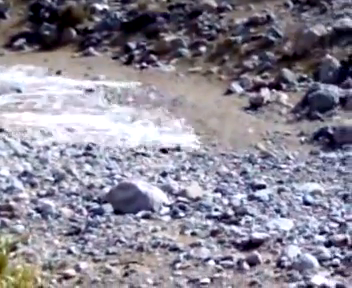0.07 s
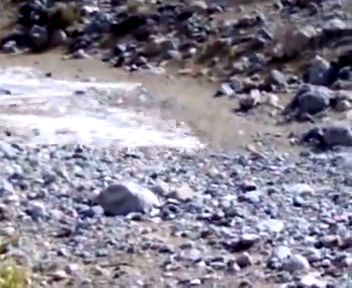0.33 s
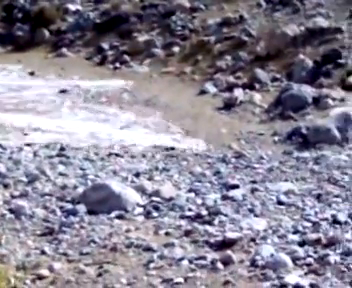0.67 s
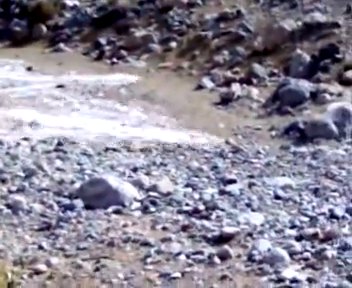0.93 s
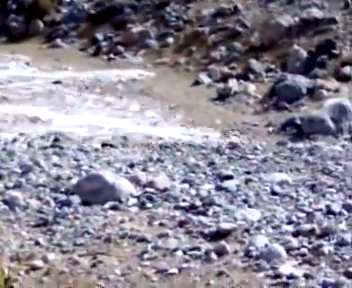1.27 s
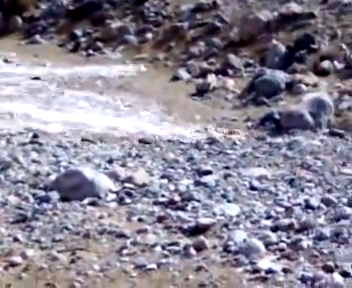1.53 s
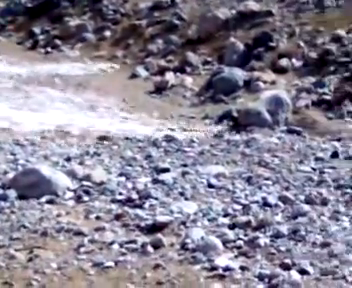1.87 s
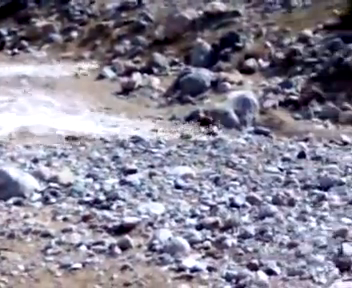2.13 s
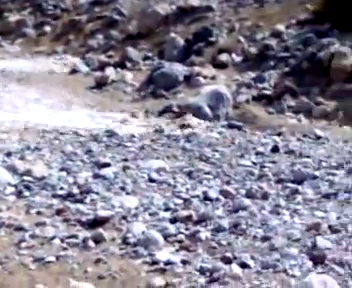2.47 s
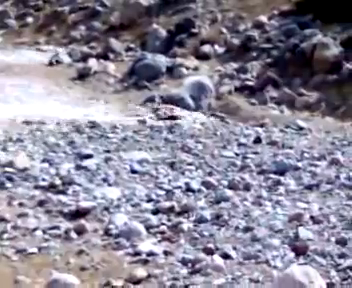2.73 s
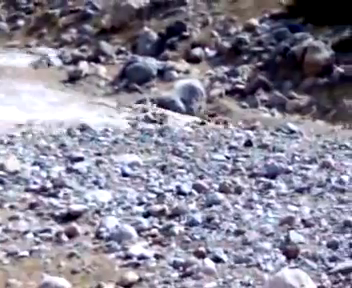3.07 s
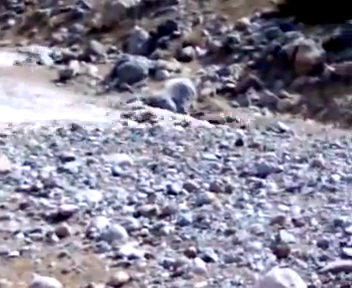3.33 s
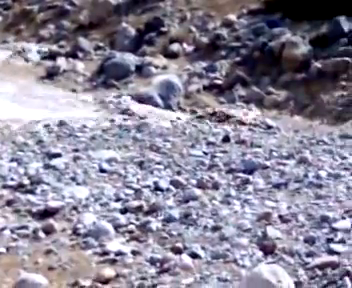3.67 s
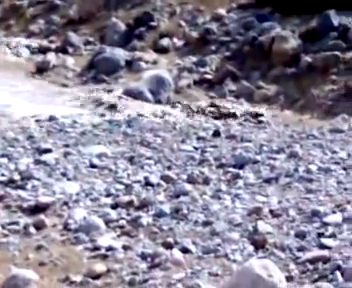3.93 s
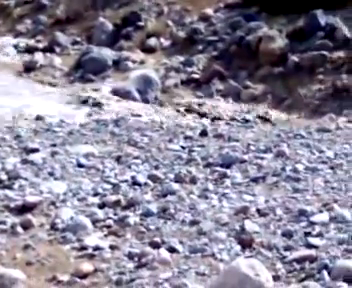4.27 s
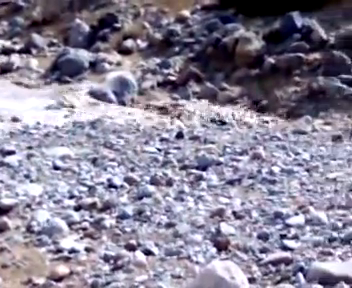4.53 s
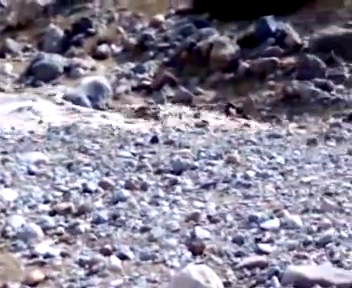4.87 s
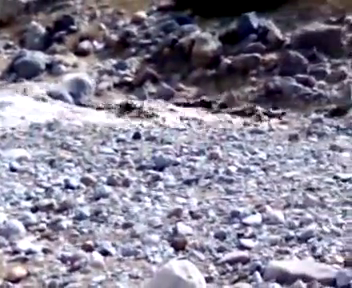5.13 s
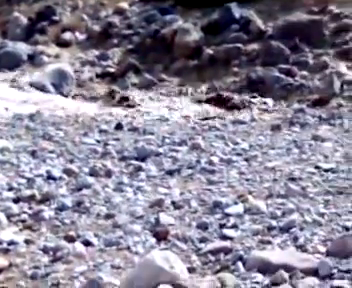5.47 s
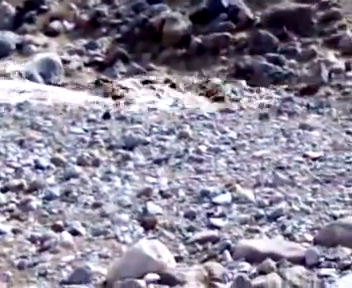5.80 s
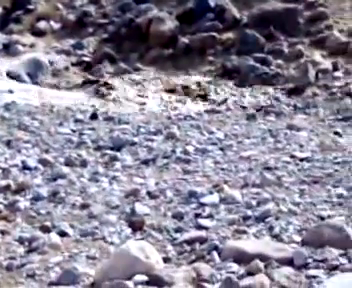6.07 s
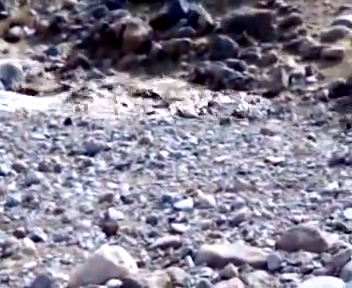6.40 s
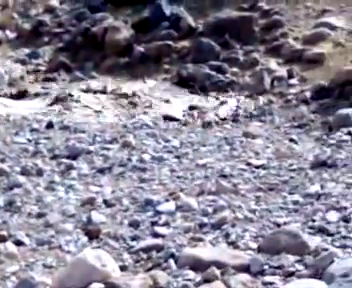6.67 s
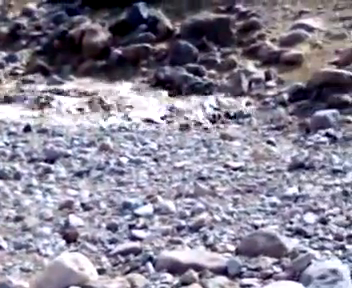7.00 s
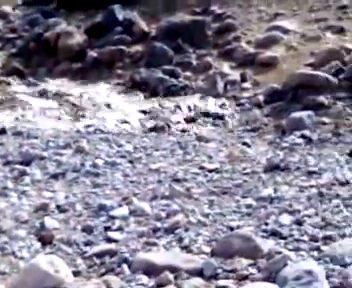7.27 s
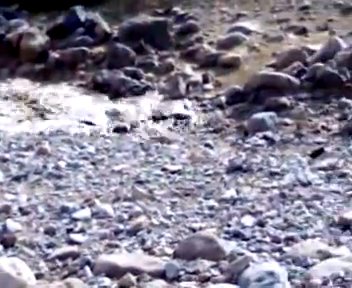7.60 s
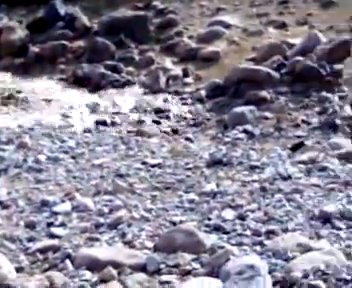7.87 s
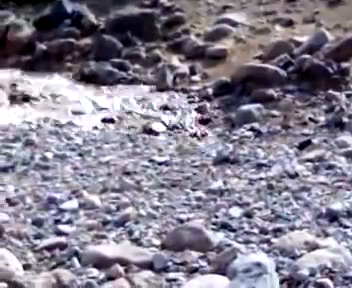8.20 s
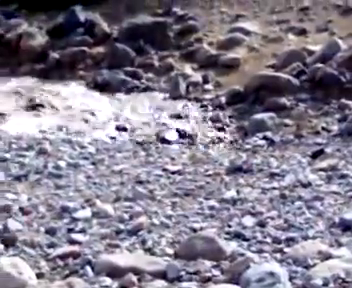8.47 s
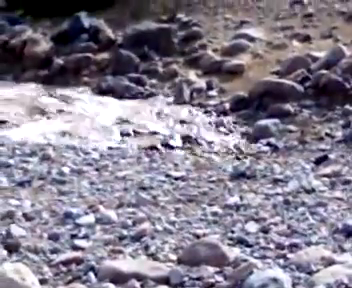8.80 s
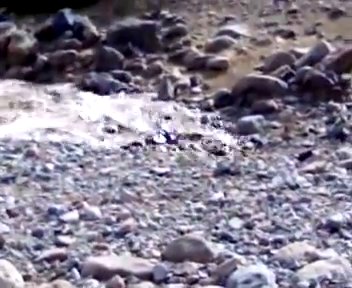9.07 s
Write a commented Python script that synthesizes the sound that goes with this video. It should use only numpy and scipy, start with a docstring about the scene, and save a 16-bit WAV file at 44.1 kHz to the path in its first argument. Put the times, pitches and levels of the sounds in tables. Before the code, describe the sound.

Wind buffets a small microphone on a gravel riverbed from the start, with short, uneven thumps and sharp pops over a deep rumble. Behind it, shallow water running over stones makes a faint, steady hiss throughout. The wind fades to a brief lull at about 2.3 seconds, returns in puffs, then hits hard from 3.5 to 4 seconds, with a rough tearing flutter and peaks that overload the microphone. It keeps gusting unevenly, easing somewhat after 6 seconds and nearly dropping out just after 7. After a short puff it builds again, and is strong and crackly from about 8.3 seconds until the end, a little after 9. Now and then stones in the current knock together with small, dry clicks, mostly hidden by the wind, at around 1.4 and 5 seconds and several times between 5.5 and 7.5 seconds.

```python
"""Gusts buffet a small microphone on the gravel bed of a rocky valley.
Eddies push the diaphragm in short, uneven pulses over a deep rumble. As the wind rises the pulses get
sharper, the air tears at the edge of the port, and the peaks overload the microphone.
Behind them a shallow flood front hisses over the stones and now and then knocks one against another."""
import sys
import numpy as np
from scipy import signal
from scipy.fft import rfft, irfft, next_fast_len
from scipy.io import wavfile
from scipy.ndimage import uniform_filter1d

SR = 44100
rng = np.random.default_rng(int(sys.argv[2]) if len(sys.argv) > 2 else 0)


def log_audio(samples):
    """Write samples as a 16-bit WAV file to the path given in sys.argv[1]."""
    # one column per channel
    frames = np.atleast_2d(samples).T
    # limit to full scale, then quantise
    limited = np.clip(frames, -1, 1)
    pcm = np.round(limited * 32767).astype(np.int16)
    wavfile.write(sys.argv[1], SR, pcm)


N = 411453
TIME = np.arange(N) / SR

# How the camera body colours distant sound. Each row: centre in Hz, width in Hz, gain in dB.
BODY_RESONANCES = [(1330, 270, 4), (1988, 220, 2.5), (2243, 220, -3.5), (2607, 200, 2.5), (3046, 250, 3.5),
                   (3477, 410, -6), (3880, 380, 2)]


def wind(eddy_hz=110, sharpening=0.18, speed_up=0.42, stutter_db=1.84, gain_db=1.52,
         rumble_db=-9.5, rumble_lag=0.18, tear_db=-46, tear_growth=1.21, burstiness=1.44):
    """Eddies stream over a deep rumble; in a strong gust the air also tears at the edge of the port."""
    # Slow swells and two lulls. Each row: time in seconds, relative wind level in dB,
    # relative flutter in dB (more flutter means sharper eddies and louder tearing).
    swells = [(0.0, -15.0, -25), (0.83, -11.5, -23.5), (0.87, -18, -38.5), (1.3, -14.5, -31),
              (1.85, -24, -37.5), (1.97, -28.5, -50.5), (2.28, -42.0, -67.5), (2.5, -26, -50.5),
              (2.72, -14, -32.5), (2.95, -24, -43.5), (3.35, -22.5, -42), (3.55, -12.0, -25.5),
              (3.8, -10.5, -18), (4.03, -15, -25), (4.25, -19.0, -34.5), (4.35, -14, -26.5),
              (4.8, -16, -31.5), (5.08, -17.5, -38), (5.37, -14.0, -28), (6.1, -21, -36.5),
              (6.7, -20.5, -37), (6.9, -20.5, -40), (6.97, -31, -57), (7.13, -45.0, -66), (7.45, -19, -42),
              (7.71, -28.5, -55.5), (8.49, -9.5, -21.5), (8.78, -12.5, -26), (8.97, -15, -33),
              (9.33, -12, -37)]
    # How the port passes the pressure of the eddies. Each row: frequency in Hz, gain in dB.
    port_tone = [(12, -8.5), (30, -8), (60, -5.5), (120, 0), (220, 2), (350, 1.75), (550, 1.5), (900, -2),
                 (1600, 5), (3000, -13)]
    # The tone of the tearing air. Each row: frequency in Hz, relative level in dB.
    tear_tone = [(100, -11), (350, 0.5), (600, 6), (1000, -4), (1600, -22.5), (3000, -39), (7000, -67)]
    slow_db, flutter_db = curves(swells)
    puff_db = puffs()
    level_db = slow_db + puff_db
    strength_db = level_db - np.median(level_db)
    flutter_rise_db = flutter_db - np.median(flutter_db) + 0.73 * puff_db
    speed = undb(speed_up * strength_db)
    pitch_hz = eddy_hz * undb(sharpening * flutter_rise_db)
    swings = colour(eddies(speed, pitch_hz), port_tone) * undb(stutter_db * walk(rate=46))
    swings /= loudness(swings, span_s=0.056) + 0.006 * np.std(swings)  # even out the level
    # the rumble grows more slowly than the eddies, so light air is mostly rumble
    rumble = band(rng.standard_normal(N), 23, 97)
    rumble *= undb(rumble_db - rumble_lag * strength_db) / loudness(rumble, span_s=0.65)
    # the tearing comes in bursts, with each swing of pressure
    tear = unit(colour(rng.standard_normal(N), tear_tone))
    tear *= loudness(swings, span_s=0.0013) ** burstiness
    tear *= undb(tear_db + tear_growth * flutter_rise_db)
    return (swings + rumble) * undb(level_db + gain_db) + tear


def eddies(speed, pitch_hz, per_second=330, pitch_spread=0.52, spread_db=4.0, slope=0.21, count=6000):
    """Each eddy is one swing of pressure; faster air brings more, and small ones are brief and weaker."""
    out = np.zeros(N)
    air_passed = np.cumsum(per_second * speed) / SR
    traits = rng.standard_normal((count, 4))
    positions = np.cumsum(rng.exponential(size=count) + 1) / 2
    arrivals = np.searchsorted(air_passed, positions)
    for i, (glancing, head_on, smallness, force) in zip(arrivals, traits):
        if i >= N:
            break
        tightness = np.exp(pitch_spread * np.clip(smallness, -2, 2.2))
        hz = pitch_hz[i] * tightness
        reach = int(0.7 * SR / hz)
        phase = np.arange(-reach, reach + 1) * (2 * np.pi * hz / SR)
        # a glancing eddy pushes then pulls; a head-on one gives a dip between two rises
        swing = (glancing * phase + head_on * (phase ** 2 - 1) / 2) / np.hypot(glancing, head_on)
        swing *= np.exp(-phase ** 2 / 2)
        add(out, (i - reach) / SR, swing * undb(spread_db * force) / tightness ** slope)
    return out


def puffs(gustiness_db=0.82):
    """The quick changes in dB around the slow wind: puffs, slacks and small random gusts."""
    # Short puffs riding on the wind. Each row: time of the peak in seconds, rise in dB, length in seconds.
    surges = [(0.05, 4, .058), (0.469, 2, 0.0504), (0.525, 4, .05), (1.06, 2.5, .03), (1.24, 3.5, 0.04935),
              (1.35, 2.5, 0.05967), (1.501, 4, .04), (1.625, 3.5, 0.04), (1.718, 5, 0.0351),
              (1.83, 6.5, .1), (1.99, 3.5, .03), (2.1, 4, .02), (2.15, 8, 0.024), (2.38, 8, 0.02478),
              (2.475, 4, .03), (2.54, 3, 0.0411), (2.91, 3, 0.0401), (3.095, 11, .085), (3.165, 7, .06),
              (3.5, 4.5, .04), (3.735, 2.5, 0.0404), (4.0, 4.5, .1), (4.17, 3, .04), (4.53, 2.5, 0.04995),
              (4.775, 3, .06), (4.86, 5, .04), (5.06, 3, .05), (5.265, 2, .04), (5.36, 4, .045),
              (5.49, 4.5, .06), (5.735, 6, .045), (5.99, 4.5, .08), (6.24, 3, .04), (6.355, 8, .05),
              (6.425, 7.5, .05), (6.62, 6, .05), (6.75, 4.5, .11), (6.915, 3.5, .03), (7.04, 5, .025),
              (7.27, 10, 0.03053), (7.605, 3.5, .04), (7.9, 2.5, .04), (8.005, 5, .04), (8.105, 5, .025),
              (8.18, 3, .04), (8.25, 4, .05), (8.65, 3.5, .04), (8.83, 3, .05), (9.085, 1.5, 0.043),
              (9.17, 2.5, .06)]
    # Brief slacks. Each row: time of the deepest point in seconds, drop in dB, length in seconds.
    slacks = [(0.145, 3.5, 0.03994), (0.355, 6, 0.089), (1.01, 3.5, 0.038), (1.19, 5, 0.048),
              (1.43, 7.5, 0.062), (1.77, 4, 0.03485), (2.05, 4.5, 0.0676), (2.33, 6, 0.0632),
              (2.425, 8, 0.0417), (3.035, 5.5, .04), (3.538, 5, .025), (3.685, 3.5, .02),
              (3.92, 3.5, 0.0301), (4.11, 3.5, .04), (4.235, 3, 0.045), (4.65, 2.5, .1), (4.975, 4, 0.062),
              (5.3, 4.5, 0.0376), (5.43, 3, 0.0389), (5.69, 5.5, .04), (6.49, 4, .05), (6.57, 3, .04),
              (7.545, 9.5, 0.062), (7.745, 5, 0.039), (7.84, 4, 0.049), (8.055, 3, .04), (8.14, 5, .025),
              (8.335, 5.5, .05), (8.96, 4.5, .07), (9.245, 7, 0.066)]
    return bells(surges) - bells(slacks) + gustiness_db * walk(rate=22)


def buffets(air, gain_db=-5.0, rebound_hz=178, rebound_s=0.0029, sweep=0.58, sweep_s=0.003, lead_s=0.0015):
    """A tight vortex snaps from suction to pressure and rebounds; a steeper front cracks more."""
    # Single hard buffets. Each row: time in seconds, relative peak in dB, rise time of the front in ms.
    hits = [(0.0537, 0.5, 0.3), (0.2908, -2.5, 0.32), (0.4403, -6, 0.37), (0.4738, -3, 0.19),
            (0.5361, -8.5, 0.55), (0.5632, -1.5, 0.31), (0.719, -16, 0.32), (0.8165, -2.5, 0.25),
            (1.0589, -1.5, 0.61), (1.1226, -1.5, 0.33), (1.229, -7, 0.45), (1.2962, -13, 0.31),
            (1.3625, -7.5, 0.52), (1.5124, -8, 0.6), (1.5853, -8, 0.41), (1.7157, -6.5, 0.49),
            (1.8048, -10.5, .45), (1.816, -8.5, .5), (1.842, -9.5, 0.63), (1.988, -16.5, 1.5),
            (2.4684, -23, 1.1), (2.626, -9, 0.72), (2.7084, -4.5, 0.49), (3.0762, -10, .32),
            (3.2663, -10, 0.46), (3.455, -11, .32), (3.5598, 1, 0.29), (3.586, -5.5, .24),
            (3.5925, 2, 0.38), (3.6038, -1, 0.36), (3.7008, 1, 0.44), (3.7106, -2.5, 0.17),
            (3.7701, -5, 0.62), (3.7929, -1.5, 0.22), (3.8147, 0, 0.22), (4.0008, -4, 0.28),
            (4.3126, -5.5, 0.48), (4.417, -5, 0.42), (4.5203, -4, .45), (4.7593, -4, 0.42),
            (4.8018, -3.5, 0.37), (4.8577, -4.5, .5), (4.8987, -2.5, 0.32), (5.3667, -3, .22),
            (5.3947, -3, 0.41), (5.7384, -5, 0.42), (5.984, -11, 0.35), (6.3121, -7, 0.27),
            (6.349, -7, .55), (6.4381, -7, 0.38), (6.616, -18, 0.4), (6.6518, -11.5, 0.2),
            (6.743, -4.5, 0.51), (7.472, -17, 0.46), (8.0057, -12, 0.4), (8.172, -6, 0.42),
            (8.25, -7, 0.32), (8.3617, -9.5, 0.3), (8.3774, 0.5, 0.37), (8.4546, 1, 0.38),
            (8.4773, -1, 0.23), (8.4888, -4, 0.22), (8.5441, -1, 0.33), (8.6326, -6, 0.18),
            (8.6425, -2.5, 0.41), (8.684, -9, .3), (8.7624, -2, 0.17), (8.814, -5.5, 0.3),
            (9.0418, -7, 0.34)]
    out, swept = np.zeros(N), np.zeros(N)
    t = np.arange(-SR // 50, SR // 50) / SR
    rebound = np.cos(2 * np.pi * rebound_hz * t) * np.exp(-(t / rebound_s) ** 2)
    # each vortex sweeps the other eddies off the port just ahead of it
    duck = sweep * np.exp(-((t + lead_s) / sweep_s) ** 2)
    for at_s, peak_db, front_ms in hits:
        push = np.tanh(1000 * t / front_ms) * rebound
        add(out, at_s + t[0], push / push.max() * undb(peak_db + gain_db))
        add(swept, at_s + t[0], duck)
    return air * (1 - np.minimum(swept, 1)) + out


def overload(pressure, ceiling=0.71, knee=3.9):
    """The microphone rounds off the largest swings of wind pressure."""
    return pressure / (1 + np.abs(pressure / ceiling) ** knee) ** (1 / knee)


def water(gain_db=-0.5, splash_db=-5.0, flicker_db=0.5):
    """Countless bursting bubbles make a hiss; nearer splashes stand out a little in each band."""
    # The tone of running water. Each row: frequency in Hz, relative level in dB.
    water_tone = [(100, 3.5), (400, -1), (700, 1.5), (1000, -3.5), (1350, -2), (1700, -2), (2300, -6),
                  (3400, -4), (4200, -8.5), (4900, -16), (6200, -16.5), (7300, -29)]
    # The nearly steady flow. Each row: time in seconds, relative level of the treble in dB.
    flow = [(0, -44.5), (4.3, -46), (5.65, -44), (6.7, -45.5), (9.33, -45)]
    hiss = np.zeros(N)
    edges_hz = np.geomspace(100, 9000, 9)
    for lo_hz, hi_hz in zip(edges_hz, edges_hz[1:]):
        fizz = rng.standard_normal(N) + undb(splash_db) * splashes(rate=350, spread_db=6.0)
        hiss += band(fizz, lo_hz, hi_hz) * undb(flicker_db * walk(rate=24))
    hiss = colour(hiss, water_tone, BODY_RESONANCES)
    treble_rms = np.std(band(hiss, 2200, 7000))
    return hiss / treble_rms * undb(curves(flow)[0] + gain_db)


def splashes(rate, spread_db):
    """Tiny splashes land as randomly timed clicks of either sign and uneven size."""
    hit = rng.random(N) < rate / SR
    size = np.minimum(rng.standard_normal(N), 2.6)
    return unit(hit * np.sign(rng.standard_normal(N)) * undb(spread_db * size))


def stones(ring_db=-3, width_ratio=1.15, upper_db=-2, crack_db=2, crack_t60=0.011, contact_s=0.0004):
    """Short knocks: stones in the current, and one sharp click at the peak of the strongest gust; each is a
    short crack and two quickly damped rings."""
    # Each row: start in seconds, relative ring peak in dB, lower ring in Hz, upper ring in Hz,
    # relative crack level in dB, seconds for the rings to fall 60 dB.
    knocks = [(1.17, -26, 1650, 2100, -49, .02), (1.3766, -19.5, 1300, 2600, -36, 0.016),
              (2.83, -25, 2700, 3900, -35, 0.018), (2.933, -25, 2050, 2600, -40, 0.022),
              (3.788, -23, 1900, 2650, -45, 0.012), (3.83, -25, 2000, 2500, -48, 0.022),
              (4.98, -18, 2150, 3500, -46, 0.018), (5.589, -20, 1290, 2550, -50, 0.03),
              (5.642, -25, 3300, 4200, -39, .018), (6.418, -20, 1950, 3200, -29, 0.028),
              (6.475, -12.5, 3050, 3880, -53, 0.013), (6.566, -25, 1900, 2400, -50, 0.016),
              (6.887, -22.5, 2070, 2920, -41, 0.025), (6.9707, -23.5, 2570, 3400, -50, 0.024),
              (7.254, -21.5, 1390, 2100, -46, 0.02), (7.3834, -20.5, 1330, 2000, -47, 0.052)]
    out = np.zeros(N)
    n = SR // 10
    t = np.arange(n) / SR
    for start_s, peak_db, low_hz, high_hz, snap_db, ring_t60 in knocks:
        grit = rng.standard_normal(3 * n)
        low, high = (unit(band(grit, hz / width_ratio, hz * width_ratio)) for hz in (low_hz, high_hz))
        ring = (low + undb(upper_db) * high)[n:-n]
        ring *= undb(-60 * t / ring_t60) * np.minimum(t / contact_s, 1)
        ring *= undb(peak_db + ring_db) / np.abs(ring).max()
        crack = unit(band(grit, 1700, 7000))[:n] * undb(-60 * t / crack_t60)
        add(out, start_s, ring + crack * undb(snap_db + crack_db))
    return colour(out, [(1000, -0.5), (4000, -4.0), (7000, -5.0)], BODY_RESONANCES)


def undb(db):
    """Decibels to gain."""
    return 10 ** (np.asarray(db) / 20)


def unit(x):
    """Scale to rms 1."""
    return x / np.sqrt(np.mean(x ** 2))


def curves(table):
    """The columns of a table, joined by straight lines in time."""
    times_s, *columns = np.transpose(table)
    return [np.interp(TIME, times_s, column) for column in columns]


def bells(table):
    """Smooth bell-shaped swells in dB, one for each row."""
    return sum(db * np.exp(-(2 * (TIME - at_s) / length_s) ** 2) for at_s, db, length_s in table)


def walk(rate):
    """A smooth random wobble of rms 1, with rate new values a second."""
    hold = max(int(SR / rate), 2)
    steps = np.repeat(rng.standard_normal(N // hold + 1), hold)
    return unit(uniform_filter1d(uniform_filter1d(steps, hold), hold)[:N])


def colour(x, outline, bumps=()):
    """Equalise by an outline of (Hz, dB) points with bell-shaped bumps on top."""
    hz = np.arange(N + 1) * SR / (2 * N) + 0.0011  # the offset keeps the log finite
    outline_hz, outline_db = np.transpose(outline)
    gain_db = np.interp(np.log(hz), np.log(outline_hz), outline_db)
    for centre, width, height in bumps:
        gain_db += height / 2 ** ((2 * (hz - centre) / width) ** 2)
    size = next_fast_len(N)
    bins_hz = np.arange(size // 2 + 1) * SR / size
    return irfft(rfft(x, size) * undb(np.interp(bins_hz, hz, gain_db)), size)[:N]


def band(x, lo_hz, hi_hz):
    """Band-pass without delay."""
    return signal.sosfiltfilt(signal.butter(2, [lo_hz, hi_hz], "band", fs=SR, output="sos"), x)


def loudness(x, span_s):
    """Running rms over about span_s seconds."""
    span = int(span_s * SR)
    return np.sqrt(uniform_filter1d(uniform_filter1d(x ** 2, span), span) + 1e-12)


def add(out, start_s, sound):
    """Mix a short sound in at start_s."""
    i = max(int(start_s * SR), 0)
    out[i:i + len(sound)] += sound[:N - i]


def scene():
    """Wind on the microphone in front of the water and its stones, in mono."""
    gusts = overload(buffets(wind()))
    return (gusts + water() + stones())[None]


def record(dry):
    """The recorder cuts the top steeply above 7400 Hz."""
    return signal.sosfilt(signal.ellip(10, 0.2, 80, 7400, fs=SR, output="sos"), dry)


dry = scene()
out = record(dry)
log_audio(out)
```